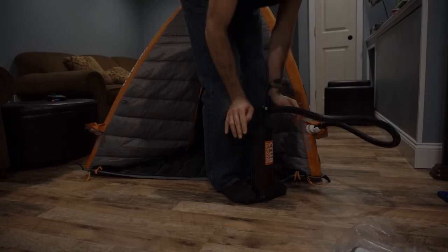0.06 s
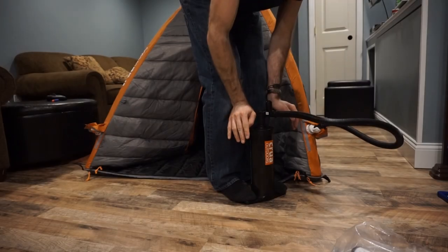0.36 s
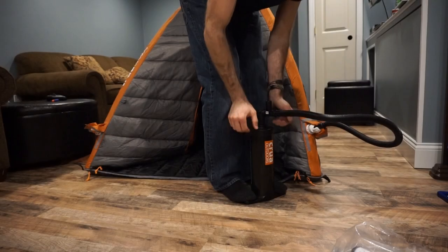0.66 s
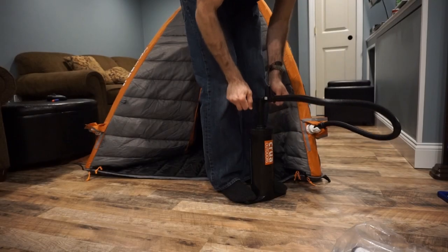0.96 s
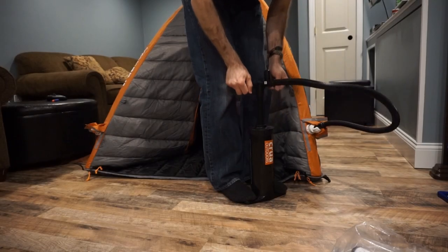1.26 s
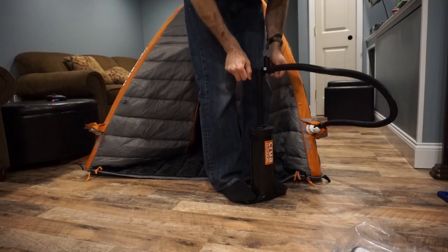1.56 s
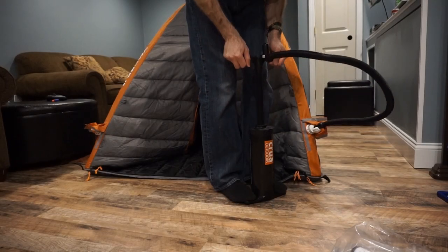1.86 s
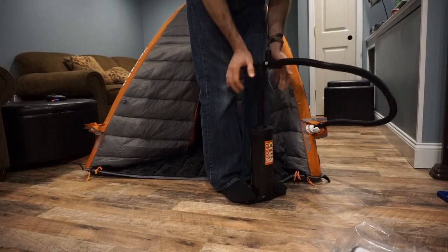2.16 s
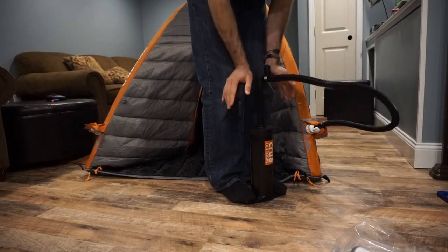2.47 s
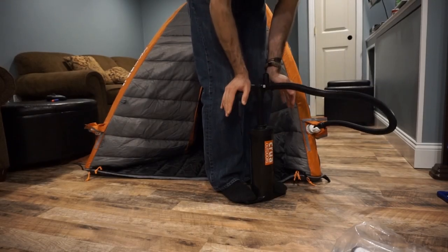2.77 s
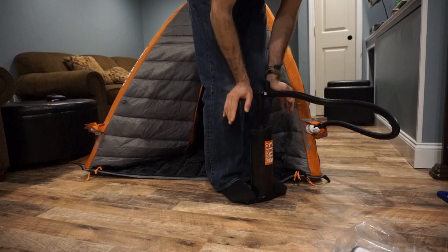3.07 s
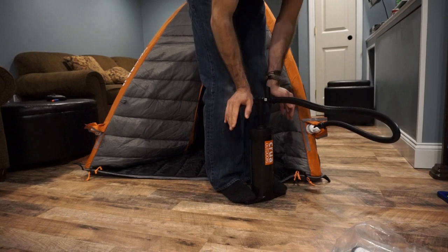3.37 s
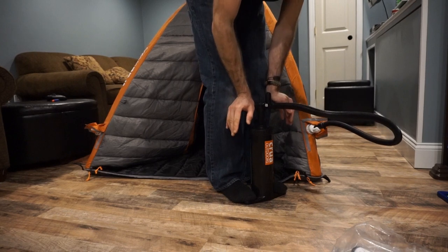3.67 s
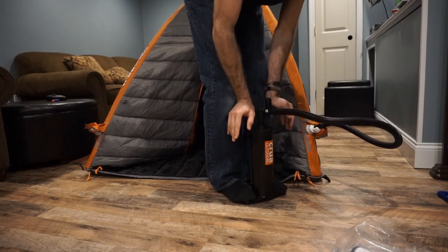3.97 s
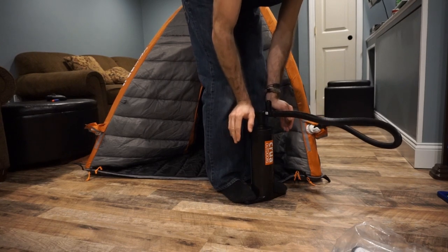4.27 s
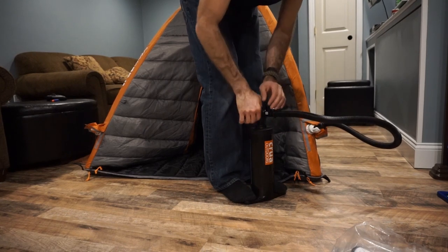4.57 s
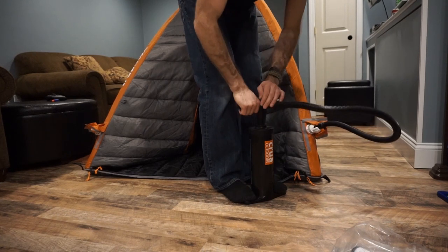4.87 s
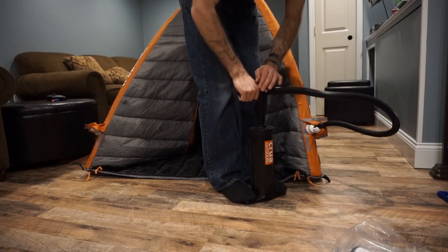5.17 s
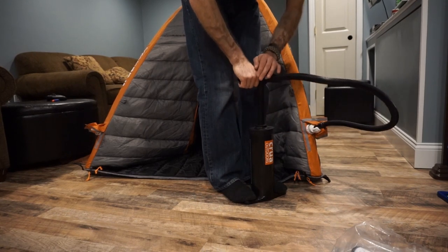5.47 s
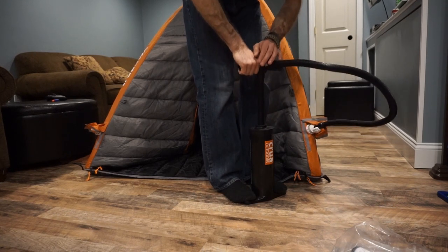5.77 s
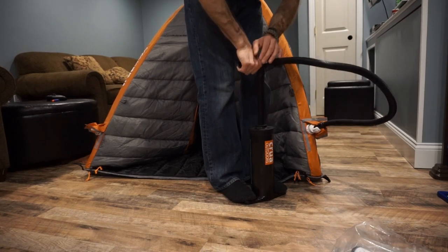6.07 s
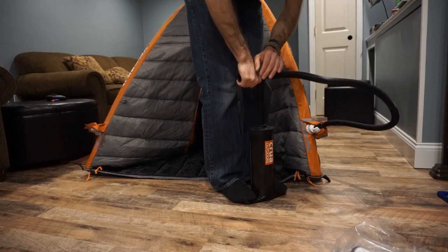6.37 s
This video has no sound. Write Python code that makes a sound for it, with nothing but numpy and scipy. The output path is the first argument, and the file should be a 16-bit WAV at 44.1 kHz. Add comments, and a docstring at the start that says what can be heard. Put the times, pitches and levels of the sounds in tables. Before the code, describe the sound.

A large hand pump is stroked slowly in a quiet room, slightly to the right. At the start a push is under way: air squeezes through a valve with a loud, very high, whistling hiss, ending with a piston knock at 0.4 seconds. At 0.8 seconds a click opens a softer, hollow intake, with dry plastic snaps and a clack near 1.9 seconds. At 2.1 seconds knocks and a short rush down the hose lead into the loud, sputtering, whistling hiss again, which holds until a knock at about 4.2 seconds. After a faint swish and a few soft thuds, a second, quieter pull runs from 4.8 to 5.9 seconds, with a couple of sharp snaps. At about 6 seconds another knock and a puff of air begin a last push. Thin, faint whistles glide during the strokes, over low room noise.

```python
"""A tall hand pump is stroked slowly into an inflatable tent in a living room.
A push is under way: air squeezes through a narrow valve gap with a loud, whistling hiss.
At 0.8 s a pull draws air in more softly. At 2.1 s a full push rushes down the hose, then hisses
and whistles as pressure builds. A second pull follows at 4.8 s; a last push begins at 6 s.
Thin whistles glide during the strokes; the piston knocks in the plastic barrel at the turns."""
import sys
import numpy as np
from scipy import signal
from scipy.fft import rfft, irfft, next_fast_len
from scipy.io import wavfile
from scipy.ndimage import uniform_filter1d, minimum_filter1d, map_coordinates

SR = 44100
rng = np.random.default_rng(int(sys.argv[2]) if len(sys.argv) > 2 else 0)


def unload_wav(signal):
    """Save mono or channel-first audio to the path in sys.argv[1] as 16-bit WAV at rate SR, clipped to [-1, 1]."""
    wavfile.write(
        sys.argv[1],
        SR,
        np.round(np.clip(np.atleast_2d(signal).T, -1, 1) * 32767).astype(np.int16),
    )


N = 283661
TIME = np.arange(N) / SR
BUILD_S = .18  # pressure rise after the gap opens

# Down strokes. Each row: start, gap opening, piston bottoming and valve closing in seconds,
# jet level in dB, dip of the quiet sounds in dB.
PUSHES = [(-1.9, -1.7, .402, .8, -19, 8), (2.09, 2.343, 4.152, 4.402, -19.6, 13.5),
          (6.03, 6.364, 8.1, 8.3, -25, 12)]


def jet(slack_hz=9900, bleed_s=.2, whistle_range_db=38, ring_range_db=23, low_cut_hz=350):
    """Air escapes the gap: sputtering hiss, plus whistle and cavity ring that rise with pressure."""
    # Gap at full pressure, a list for each of the first two pushes.
    # Each row: time in seconds, whistle in Hz, cavity resonance in Hz.
    full_pressure = [
        [(0.0, 13300, 10150), (0.4, 13000, 10300)],
        [(2.52, 12250, 10700), (2.6, 12749, 10600), (2.92, 13130, 10600), (3.022, 13414, 10850),
         (3.08, 13727, 10900), (3.906, 13290, 10150), (4.15, 13366, 10500)],
    ]
    # Cavity modes. Each row: multiple of the resonance, width in Hz, level in dB.
    cavity_modes = [(1, 170, -15), (1.14, 220, -15), (.82, 330, -23.5)]
    times_s, whistle_hz, cavity_hz = np.concatenate(full_pressure).T
    pressure = sum(envelope(opens, bottom, BUILD_S, bleed_s) for _, opens, bottom, *_ in PUSHES)
    tuned = lambda held_hz: slack_hz + pressure * (np.interp(TIME, times_s, held_hz) - slack_hz)
    pitch_hz = tuned(whistle_hz) + 36 * wobble(40)
    whistle = singing(pitch_hz, width_hz=100, spread=.4, steady=.45)
    skirt = amp(-6.5) * singing(pitch_hz, width_hz=515, spread=.7, steady=.73)
    cavity = np.zeros((2, N))
    for multiple, width_hz, db in cavity_modes:
        drift_db = 2.5 * wobble(5) + 1.5 * wobble(20)
        mode_hz = multiple * tuned(cavity_hz) + 110 * wobble(7)
        cavity += amp(db + drift_db) * singing(mode_hz, width_hz, spread=.77)
    tones = amp(-3 - whistle_range_db * (1 - pressure)) * whistle
    tones += amp(-ring_range_db * (1 - pressure)) * (skirt + cavity)
    sputter = amp(.45 * wobble(110) + .9 * wobble(550))
    air = sputter * (escaping_air() + amp(-13) * (pressure > 0) * tones)
    return filtered(air, lambda hz: hz ** 2 / (hz ** 2 + low_cut_hz ** 2))


def escaping_air(seep_db=-34, spit_db=-19.5):
    """Air seeps all through a push; the gap opens with a spit and hisses until pressure is spent."""
    # Spectra of the hiss and the spit. Each row: frequency in Hz, level in dB.
    hiss_colour = [(100, -66), (600, -40), (1700, -38), (3400, -27), (4600, -25.5), (6200, -18),
                   (8000, -11), (10000, -3), (12000, -1.5), (15700, -3)]
    spit_colour = [(5000, -35), (10000, -12), (13000, 0), (15700, 0)]
    flow, seep, spit = np.zeros((3, N))
    for start, opens, bottom, shuts, db, _ in PUSHES:
        gap = envelope(opens, bottom, attack_s=.028, release_s=.2) ** .65
        flow += amp(db) * gap
        spit += gap * dying(opens, decay_s=.07)
        seep += envelope(start, shuts, attack_s=.09, release_s=.005)
    hiss = np.hypot(flow, amp(seep_db) * seep) * patchy(rush(hiss_colour), depth_db=2.2)
    return hiss + amp(spit_db) * spit * rush(spit_colour)


def hose(free_db=-36, trickle_db=-47.5, attack_s=.07, fill_s=.43, choke_s=.11):
    """A push flows freely through the hose, then chokes to a trickle as pressure builds."""
    # Hose flow spectrum. Each row: frequency in Hz, level in dB.
    colour = [(60, -41), (170, -17), (330, -9), (600, -8), (880, -2), (1140, -5), (2100, -2.5), (2750, -6),
              (3100, -13.5), (7000, -16.5), (10000, -27)]
    flow = np.zeros(N)
    for start, _, bottom, *_ in PUSHES:
        flow += amp(free_db) * envelope(start, start + fill_s, attack_s, choke_s)
        flow += amp(trickle_db) * envelope(start + fill_s, bottom, choke_s, choke_s) * sinking()
    return amp(1.1 * wobble(60)) * flow * rush(colour)


def intake(swell_s=.26):
    """A pull surges into the barrel; the inlet flap's hiss swells later and sags in mid-stroke."""
    # Up strokes. Each row: start, slowing and release time in seconds,
    # then inlet hiss, mid-stroke sag, barrel rush and opening surge in dB.
    pulls = [(.81, 1.88, .09, -24, 1.5, -36, 5), (4.755, 5.85, .21, -28.3, 5.5, -35, -1)]
    # Spectra of inlet and barrel flow. Each row: frequency in Hz, level in dB.
    inlet_colour = [(2000, -43), (4000, -9.5), (7000, -6), (10000, 3), (14000, 3), (15700, 1)]
    barrel_colour = [(45, -44), (260, -5.5), (700, 0), (1200, -4), (1700, -5), (1900, -1), (2300, -1),
                     (3100, -3), (7500, -4)]
    hiss, barrel = np.zeros((2, N))
    for start, slows, release_s, hiss_db, sag_db, rush_db, surge_db in pulls:
        mid_stroke = np.sin(np.pi * np.interp(TIME, [start + swell_s, slows], [0, 1]))
        hiss += amp(hiss_db - sag_db * mid_stroke) * envelope(start, slows, swell_s, release_s) ** 1.9
        barrel_db = rush_db + surge_db * dying(start + swell_s, decay_s=.28)
        barrel += amp(barrel_db) * envelope(start, slows, attack_s=.085, release_s=.3)
    return patchy(hiss * rush(inlet_colour) + barrel * rush(barrel_colour), depth_db=1.2)


def gulps():
    """The valve flips open at each turn and passes a rounded rush of air."""
    # Valve openings. Each row: start, rise, hold and decay time in seconds, level in dB.
    openings = [(.835, .06, .14, .2, -36), (2.16, .025, .02, .1, -30), (4.77, .04, .08, .05, -40),
                (6.08, .045, .02, .05, -34)]
    # Valve flow spectrum. Each row: frequency in Hz, level in dB.
    colour = [(50, -40), (1500, -9), (1900, -2), (2250, 0), (2750, -2), (3100, -12), (6500, -15),
              (11000, -28)]
    flow = np.zeros(N)
    for start, rise_s, hold_s, decay_s, db in openings:
        rise = np.clip((TIME - start) / rise_s, 0, 1)
        flow += amp(db) * rise * dying(start + rise_s + hold_s, decay_s)
    return flow * rush(colour)


def tube(x, mode_spacing_hz=462):
    """Sound bounces between the shaft's ends, giving the moving air a hollow ring."""
    # Echo of the open end. Each row: frequency in Hz, share sent back.
    reflection = [(600, .02), (1400, .25), (3500, .34), (10000, .06)]

    def response(hz):
        echo = along(reflection, hz)
        return np.sqrt(1 - echo ** 2) / (1 - echo * np.exp(-2j * np.pi * hz / mode_spacing_hz))
    return filtered(x, response)


def knocks(upper_edges_hz=(750, 1080, 3000), rattle_t60_s=.14, ring_db=-6):
    """Knocks ring the barrel over a dense rattle; hard ones clack, soft ones thud, hands damp them."""
    # Piston and handle knocks. Each row: start in seconds, thud level in dB, thud frequency in Hz,
    # knock and clack bands in dB relative to the thud, damping in dB per second.
    hits = [(0.399, -25, 500, -13, -4.5, 0), (0.801, -30.5, 480, -18, -23, 100),
            (1.893, -17, 330, -11, 0.5, 40), (2.093, -29.5, 600, 0.5, -3, 120),
            (2.108, -28.5, 480, -1, -8, 200), (2.324, -24.5, 720, -8, -17, 80),
            (4.151, -27.5, 520, -13, -2, 30), (4.715, -26, 540, -8, -21, 800),
            (4.731, -28.5, 397, -22, -26, 150), (4.823, -35, 400, -10, -18, 600),
            (6.064, -27, 450, -0.5, -15, 80), (6.107, -34, 650, -3, -5, 100)]
    # Barrel modes. Each row: frequency in Hz, level in dB, T60 in seconds.
    modes = [(209.4, -14.5, .3), (345, -6, 0.1), (418, -8, 0.099), (596.8, -5.5, 0.084), (750, -6, .08),
             (1020, -10, 0.09), (1420, -3.5, 0.13), (2650, -4, 0.08)]
    # Rattle spectrum. Each row: frequency in Hz, level in dB.
    colour = [(100, -17), (400, -3), (1400, 1), (2700, 3), (3600, -15)]
    out, t = np.zeros((2, N)), np.arange(SR // 2) / SR
    for start, thud_db, thud_hz, knock_db, clack_db, damping_db_per_s in hits:
        ring = np.zeros(len(t))
        for hz, db, t60_s in modes:
            decay = amp(db + rng.normal(0, 2) - 60 * t / t60_s)
            ring += decay * np.sin(2 * np.pi * (hz * t + rng.random()))
        rattle = amp(-60 * t / rattle_t60_s) * rush(colour, len(t))
        blow = (amp(ring_db) * ring + rattle) * amp(-damping_db_per_s * t)
        edges_hz = [.71 * thud_hz, *upper_edges_hz]  # a light contact misses the lowest modes
        for band_hz, db, order in zip(zip(edges_hz, edges_hz[1:]), [0, knock_db, clack_db], [2, 4, 3]):
            band = signal.sosfilt(signal.butter(order, band_hz, "bandpass", fs=SR, output="sos"), blow)
            onset_rms = np.sqrt(np.mean(band[:, :SR // 50] ** 2))
            add(out, start, amp(thud_db + db - 3.5) * band / onset_rms)
    return out


def ticks(t60_s=.028):
    """The plastic shaft and valve give small, dry snaps."""
    # Snaps. Each row: start in seconds, level in dB.
    snaps = [(.802, -21.5), (1.4637, -15.5), (1.7685, -11), (1.8925, -14), (2.109, -25), (5.605, -11.5),
             (5.922, -17.5), (6.0675, -20)]
    # Snap spectrum. Each row: frequency in Hz, level in dB.
    colour = [(100, -45), (600, 2), (2000, -8), (3200, 6), (4500, -3.5), (13000, 3), (16000, 6.5)]
    out, t = np.zeros((2, N)), np.arange(SR // 8) / SR
    for start, db in snaps:
        add(out, start, amp(db - 3 - 60 * t / t60_s) * rush(colour, len(t)))
    return out


def thin_whistles(fade_share=.2, min_fade_s=.025):
    """Thin, rough, gliding whistles that follow the airflow."""
    # Whistles. Each row: start and length in seconds, first and last pitch in Hz,
    # glide exponent (1 is straight), level in dB.
    glides = [(0, .4, 612, 561, 1, -51), (1.15, .53, 1660, 1470, .9, -49), (2.15, .05, 1450, 2300, .6, -37),
              (2.17, .37, 920, 880, 1, -41), (2.35, .255, 1670, 1000, 1.9, -42.5),
              (2.595, .065, 1010, 760, .7, -49.5), (2.665, .045, 780, 910, 1, -51),
              (2.76, .2, 900, 930, 1, -60), (3.1, 1, 710, 590, 1, -62), (4.96, .2, 1410, 1480, 1, -45.5),
              (5.19, .37, 2920, 2780, 2, -50), (5.24, .16, 1460, 1420, 1, -45.5),
              (5.43, .33, 1440, 1400, .4, -48), (6.1, .33, 929, 857, 1, -49.5)]
    out = np.zeros((2, N))
    waver = 1 + .015 * wobble(22)
    flutter = amp(2 * wobble(18))
    for start, length_s, first_hz, last_hz, bend, db in glides:
        fade_s = max(fade_share * length_s, min_fade_s)
        gain = amp(db) * flutter * envelope(start, start + length_s, fade_s, fade_s)
        active = gain > 0
        progress = (TIME[active] - start) / length_s
        pitch_hz = waver[active] * (first_hz + (last_hz - first_hz) * progress ** bend)
        out[:, active] += gain[active] * singing(pitch_hz, width_hz=34, spread=.6, steady=.35)
    return out


def rustles():
    """Short, soft swishes between strokes, as of hands and cloth."""
    # Swishes. Each row: middle and half length in seconds, level in dB.
    swishes = [(.71, .07, -40.5), (2.13, .06, -44), (4.365, .04, -45), (4.615, .05, -51)]
    # Swish spectrum. Each row: frequency in Hz, level in dB.
    colour = [(80, -32), (3000, -12), (6500, 0), (9000, -3), (15000, -9)]
    gain = sum(amp(db) * envelope(mid - half, mid, half, half) for mid, half, db in swishes)
    return gain * rush(colour)


def walls(x, echo_db, reach_s, count=24):
    """Near floor and wall echoes comb the sound, differently on each side."""
    taps = np.zeros((2, SR // 10))
    for side in taps:
        signs = rng.choice([-1, 1], count)
        delays = (rng.uniform(.08, 1, count) * reach_s * SR).astype(int)
        side[delays] = amp(echo_db) * signs
    taps[:, 0] = 1
    return signal.fftconvolve(x, taps / np.linalg.norm(taps[0]), axes=1)[:, :N]


def room(x):
    """The room's tail, each frequency dying at its own rate."""
    # Reverberation. Each row: frequency in Hz, T60 in seconds.
    decay_times = [(1000, 0.39), (12000, 0.45)]
    hz, t, spectrum = signal.stft(rng.standard_normal((2, SR // 2)), SR, nperseg=256)
    decay = amp(-60 * t / along(decay_times, hz)[:, None])
    tail = signal.istft(spectrum * decay, SR, nperseg=256)[1]
    return signal.fftconvolve(x, tail / np.linalg.norm(tail[0]), axes=1)[:, :N]


def nulls(x, centres_hz=(475, 1100), relative_width=.11, depth=.5):
    """Room reflections partly cancel narrow bands."""
    def band(hz, centre_hz):
        damping = 1j * hz * relative_width * centre_hz
        return damping / (centre_hz ** 2 - hz ** 2 + damping)
    return filtered(x, lambda hz: 1 - depth * sum(band(hz, centre) for centre in centres_hz))


def background():
    """Faint, low room noise that dips under the jet."""
    # Room noise spectrum. Each row: frequency in Hz, level in dB.
    colour = [(30, -26), (85, -23), (250, -4.5), (600, 0), (1600, -11), (2600, -13), (4500, -20),
              (15500, -21.5)]
    return amp(-45.3) * sinking() * rush(colour)


def sinking(sink_s=.5, recover_s=.22):
    """Gain of the quiet sounds, which sink while the jet is loud."""
    dip_db = sum(db * envelope(opens + BUILD_S, bottom, sink_s, recover_s)
                 for _, opens, bottom, _, _, db in PUSHES)
    return amp(-dip_db)


def rush(colour, size=N):
    """Coloured stereo noise of rms 1, more alike in the bass."""
    # Stereo image. Each row: frequency in Hz, left-right correlation.
    correlation = [(60, 0.7), (300, 0.4), (2000, 0.25), (5000, .35), (13000, 0.48)]

    def response(hz):
        angle = np.arccos(along(correlation, hz)) / 2
        return amp(along(colour, hz)) * [np.cos(angle), np.sin(angle)]
    mid, side = filtered(rng.standard_normal((2, size)), response)
    return unit(np.array([mid + side, mid - side]))


def singing(pitch_hz, width_hz, spread, steady=0):
    """Turbulence rings a narrow resonance that follows a pitch; steady (0-1) evens out its swings."""
    slow = filtered(rng.standard_normal((4, len(pitch_hz))), lambda hz: 1 / (1 + (hz / width_hz) ** 2))
    swing = slow[:2] + 1j * slow[2:]
    carrier = np.exp(2j * np.pi * np.cumsum(pitch_hz) / SR)
    mid, side = np.real(swing / np.abs(swing) ** steady * carrier)
    return unit(np.array([mid + spread * side, mid - spread * side]))


def patchy(x, depth_db):
    """Different bands of the hiss swell and fade from moment to moment."""
    spectrum = signal.stft(x, nperseg=512)[2]
    band_swells = uniform_filter1d(rng.standard_normal(spectrum.shape[1:]), size=4, axis=0)
    band_swells = uniform_filter1d(band_swells, size=32, axis=1)
    return signal.istft(spectrum * amp(depth_db * unit(band_swells)), nperseg=512)[1][:, :N]


def envelope(start, end, attack_s, release_s):
    """0-1: rises from start, holds until end, then falls."""
    return np.clip(np.minimum((TIME - start) / attack_s, 1 - (TIME - end) / release_s), 0, 1)


def dying(start, decay_s):
    """1 until start, then exponential decay."""
    return np.exp(-np.maximum(TIME - start, 0) / decay_s)


def wobble(rate_hz):
    """Smooth random curve, rate_hz knots a second."""
    return map_coordinates(rng.standard_normal(int(N * rate_hz / SR) + 4), [TIME * rate_hz])


def filtered(x, response):
    """Apply a frequency response to x."""
    size = x.shape[-1]
    padded = next_fast_len(size + 8192)
    return irfft(rfft(x, padded) * response(np.fft.rfftfreq(padded, 1 / SR)), padded)[..., :size]


def along(points, hz):
    """Read (Hz, value) points on a log axis."""
    knots_hz, values = np.transpose(points)
    return np.interp(np.log(hz + 1), np.log(knots_hz + 1), values)


def add(track, start, sound):
    """Mix a sound in at start seconds."""
    part = track[:, round(start * SR):][:, :sound.shape[1]]
    part += sound[:, :part.shape[1]]


def amp(db):
    """Decibels to gain."""
    return 10 ** (np.asarray(db) / 20)


def unit(x):
    """Scale to rms 1."""
    return x / np.sqrt(np.mean(np.abs(x) ** 2) + 1e-20)


def scene():
    """Pump and valve jet over the room noise, all louder on the right."""
    blows = knocks() + ticks()
    airflow = tube(hose() + intake() + gulps())
    pump = airflow + thin_whistles() + rustles() + blows + amp(-12.5) * room(blows)
    valve_jet = walls(jet(), echo_db=-20, reach_s=.02)
    return nulls(pump + background()) * amp([[-1.8], [1.5]]) + valve_jet * amp([[-2.6], [2.2]])


def record(dry, top_hz=15800, ceiling=.96):
    """Band limit, slight lag on the left, fast peak limiter."""
    lag_s = np.array([[7e-6], [0]])
    x = filtered(dry, lambda hz: (hz < top_hz) * np.exp(-2j * np.pi * hz * lag_s))
    needed_gain = np.minimum(1, ceiling / (np.abs(x).max(axis=0) + 1e-9))
    gain = uniform_filter1d(minimum_filter1d(needed_gain, size=65), size=65)
    return filtered(x * gain, lambda hz: hz < top_hz)


dry = scene()
out = record(dry)
unload_wav(out)
```